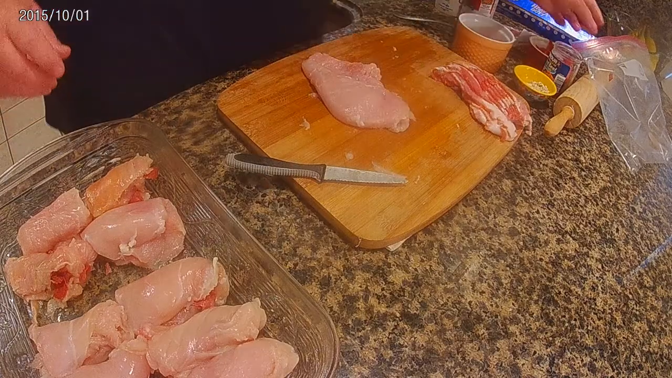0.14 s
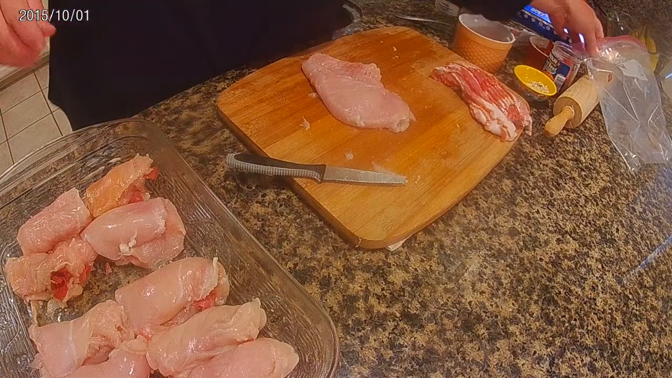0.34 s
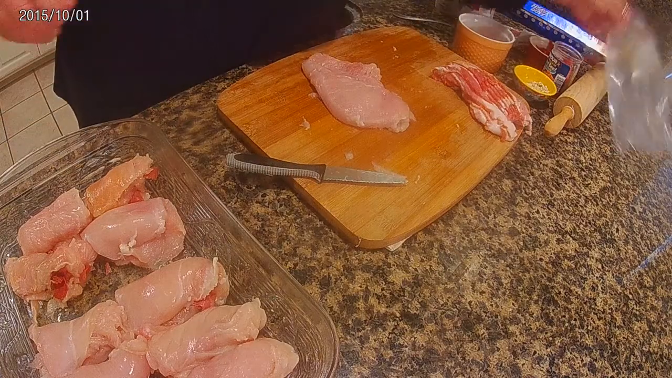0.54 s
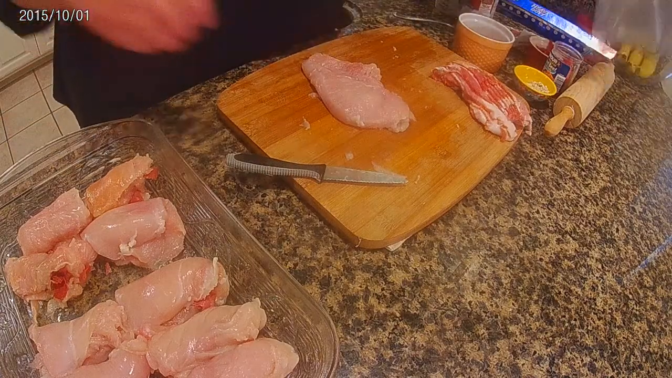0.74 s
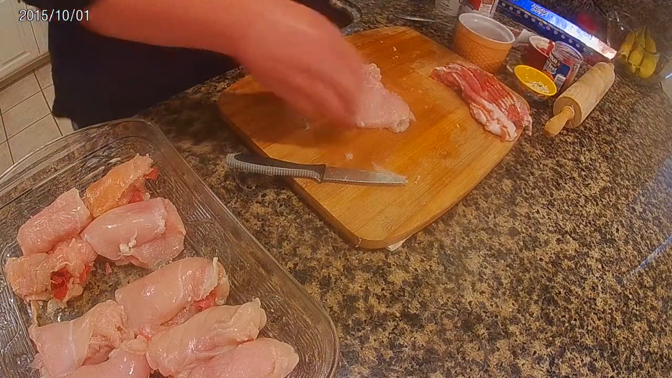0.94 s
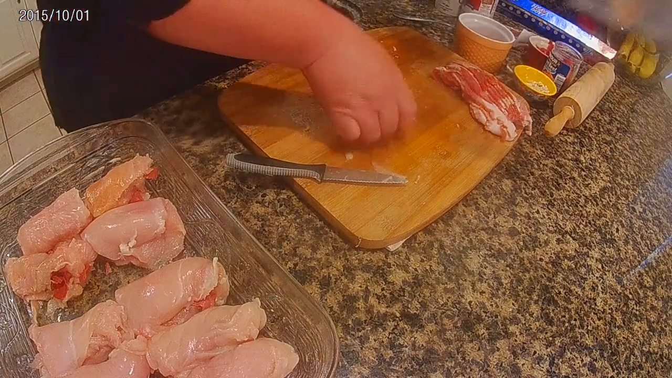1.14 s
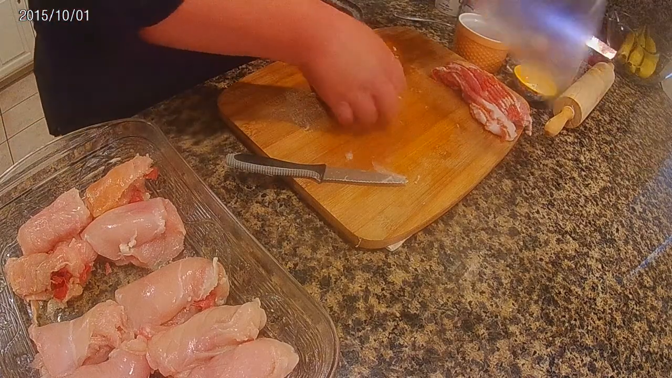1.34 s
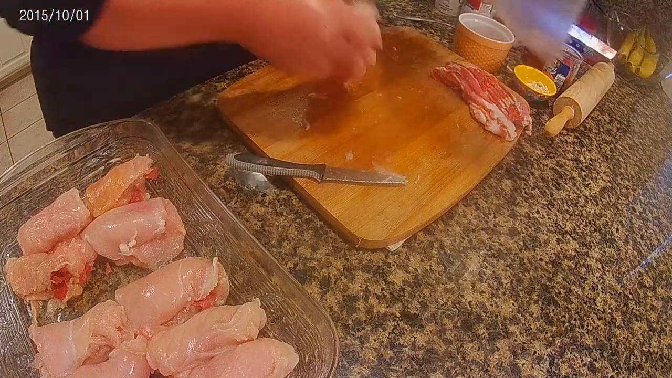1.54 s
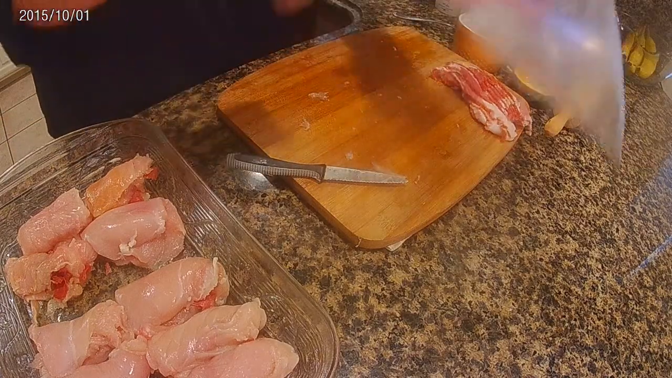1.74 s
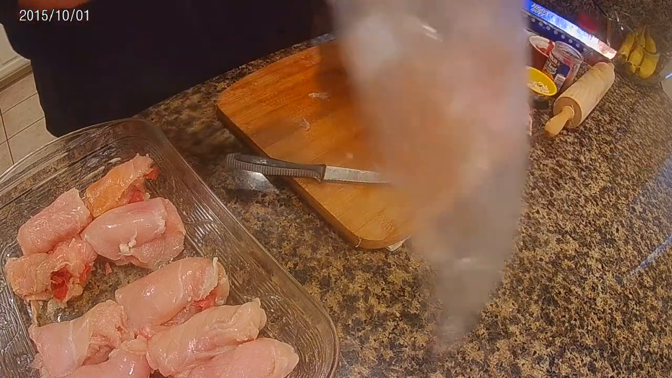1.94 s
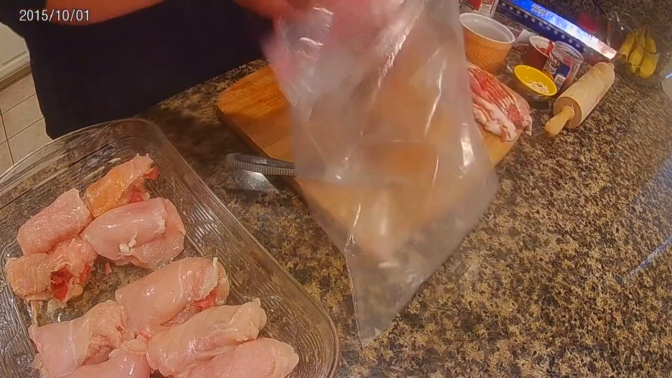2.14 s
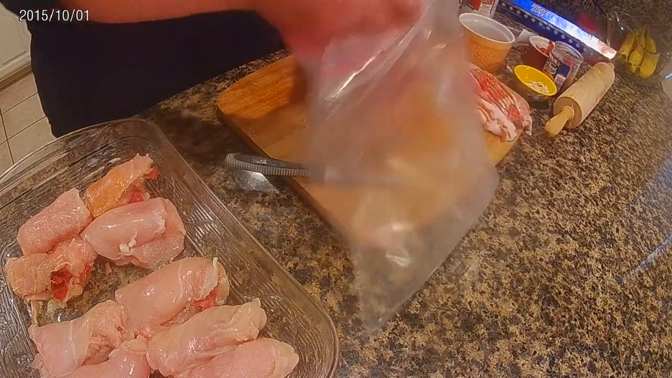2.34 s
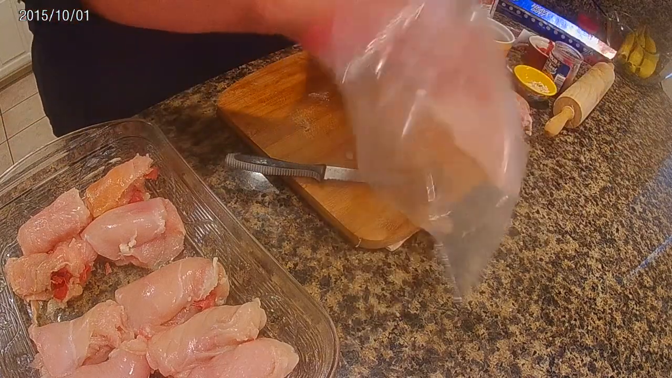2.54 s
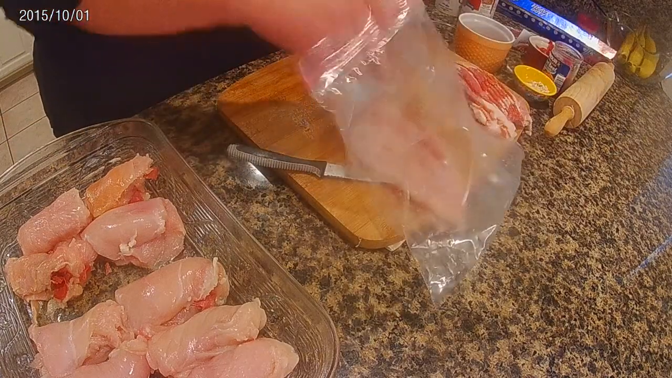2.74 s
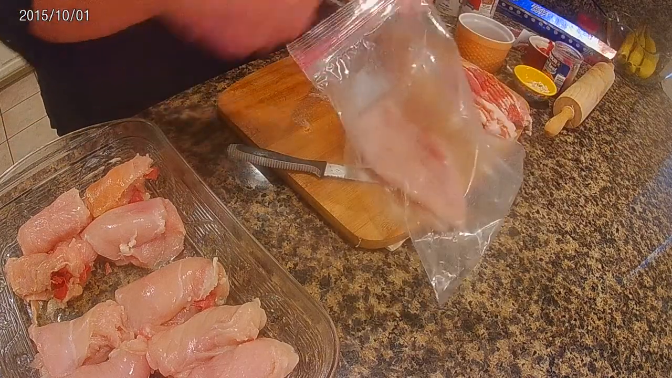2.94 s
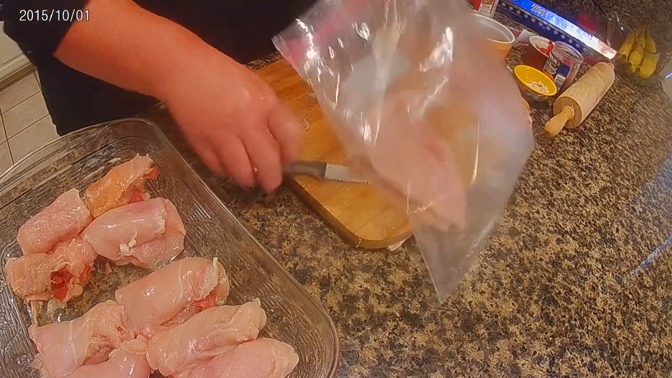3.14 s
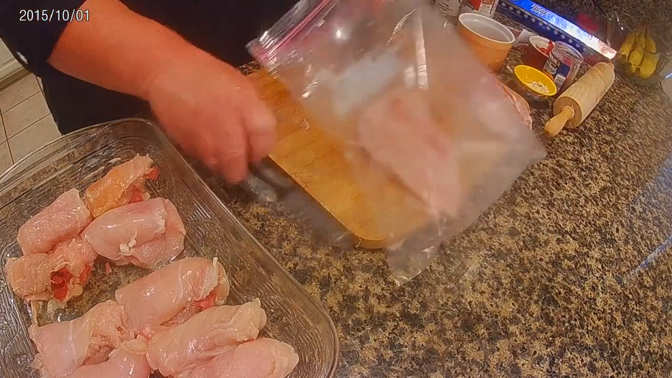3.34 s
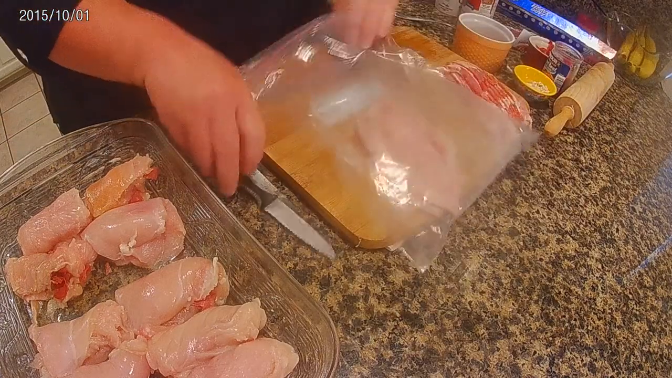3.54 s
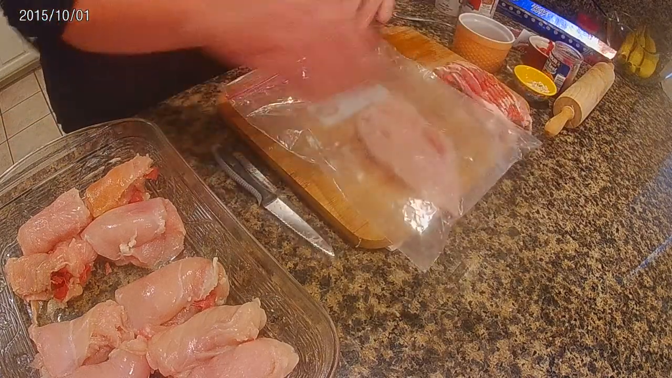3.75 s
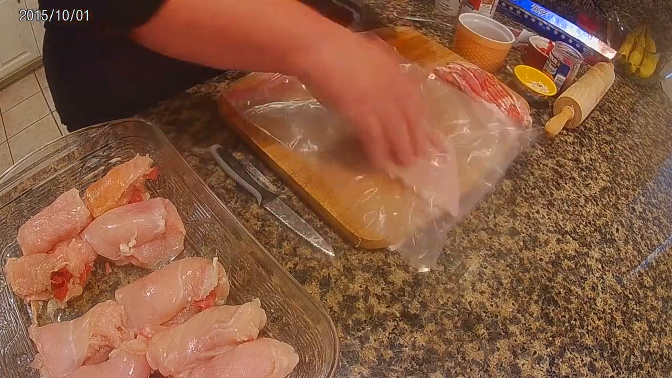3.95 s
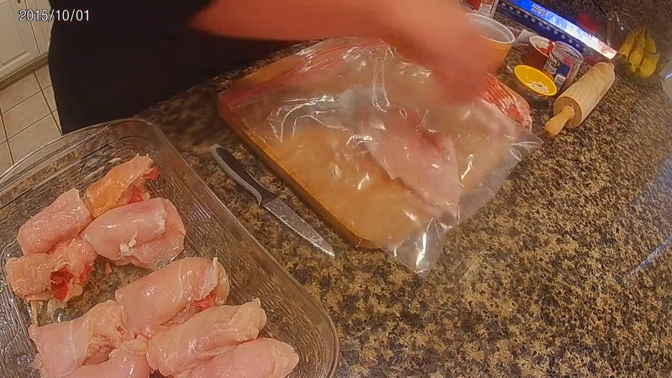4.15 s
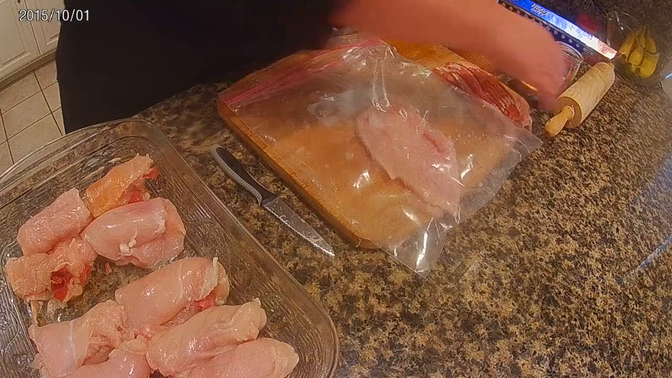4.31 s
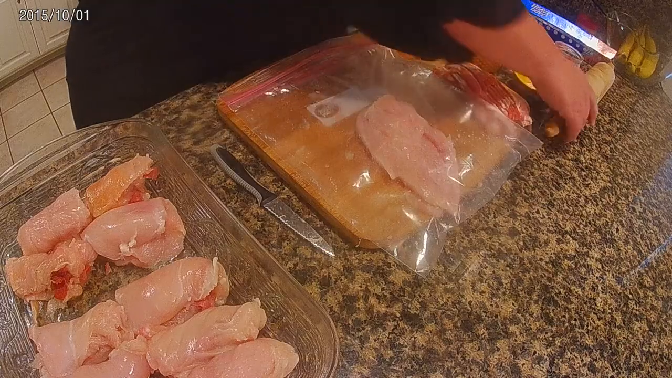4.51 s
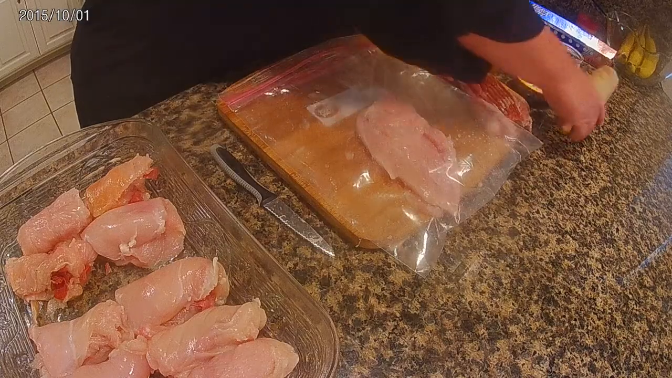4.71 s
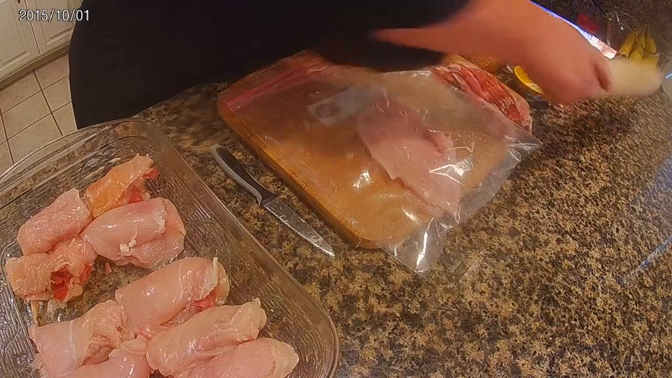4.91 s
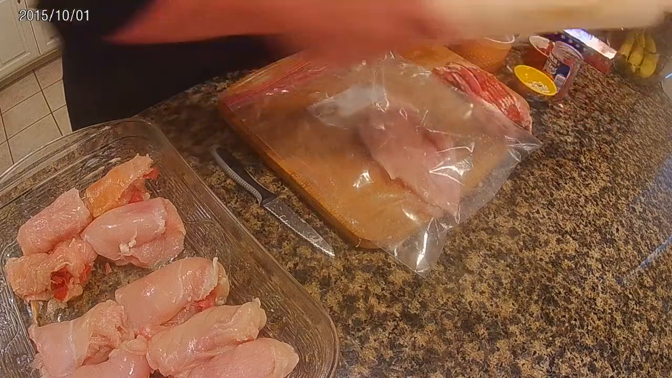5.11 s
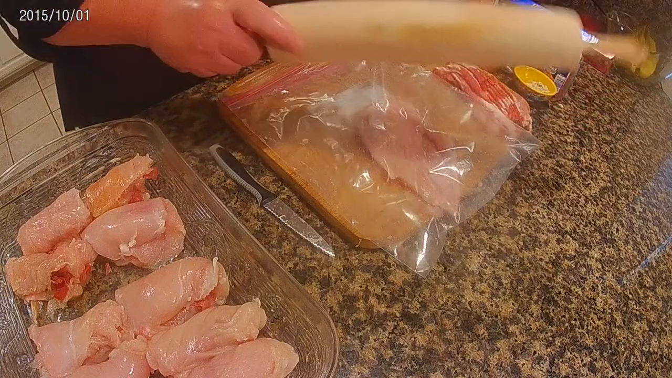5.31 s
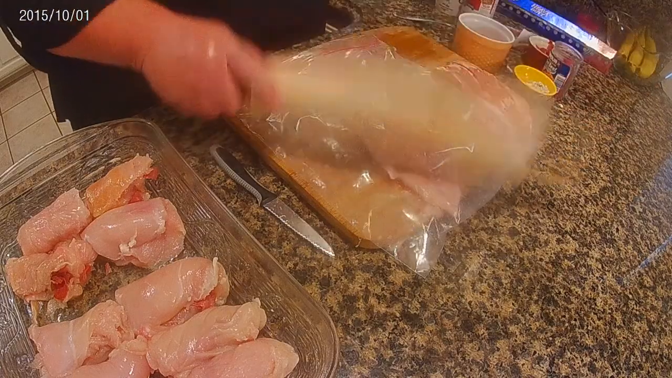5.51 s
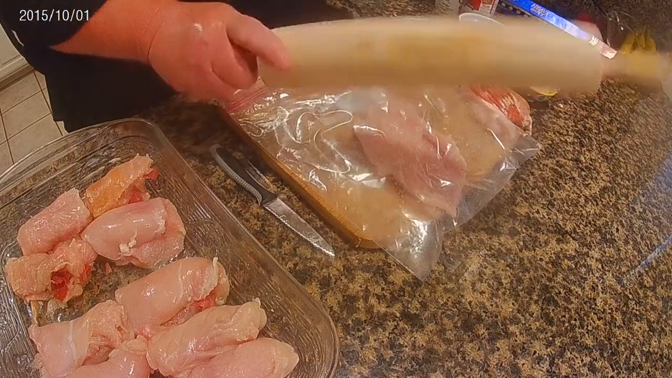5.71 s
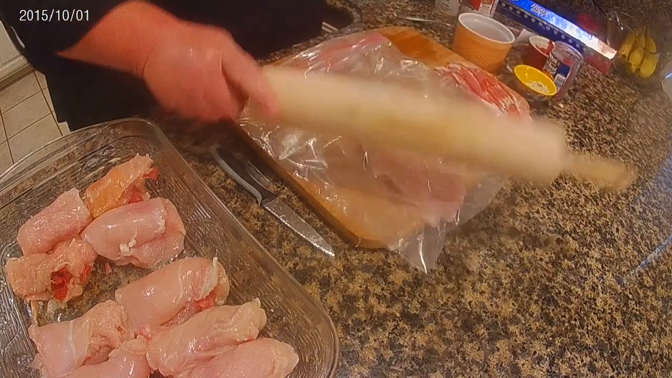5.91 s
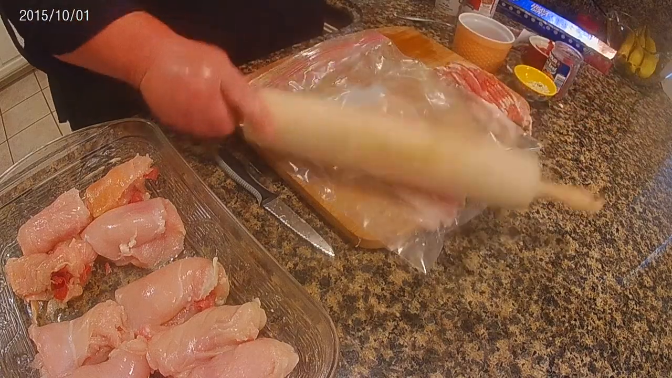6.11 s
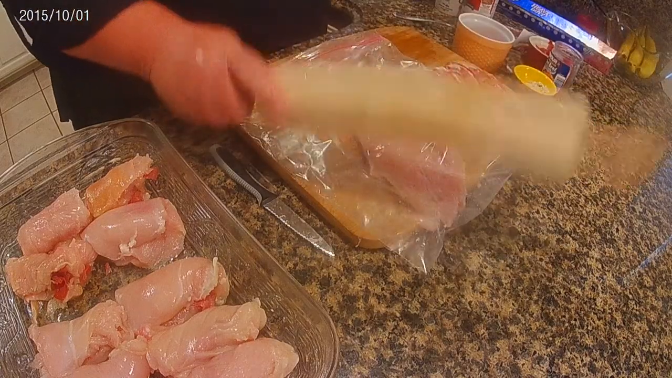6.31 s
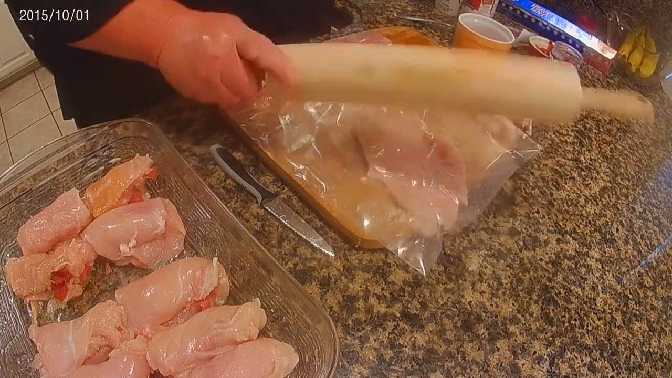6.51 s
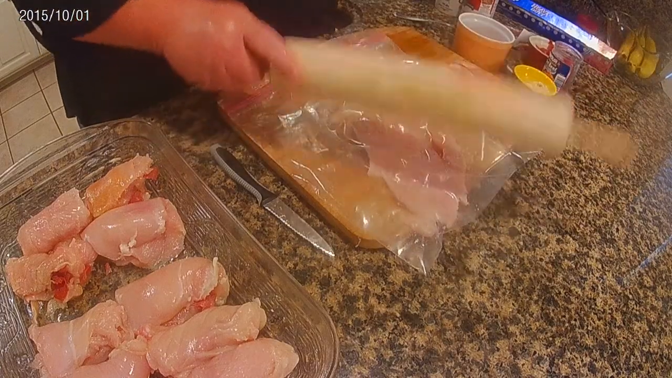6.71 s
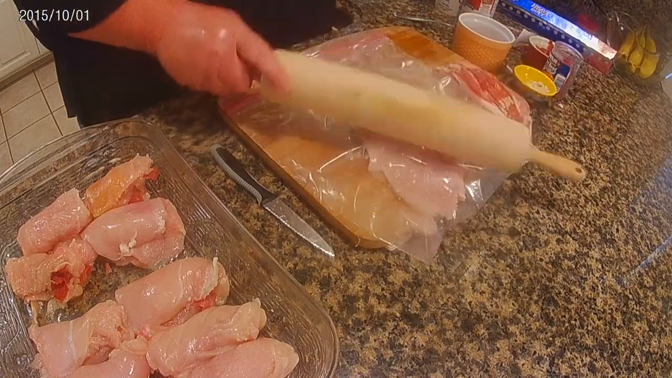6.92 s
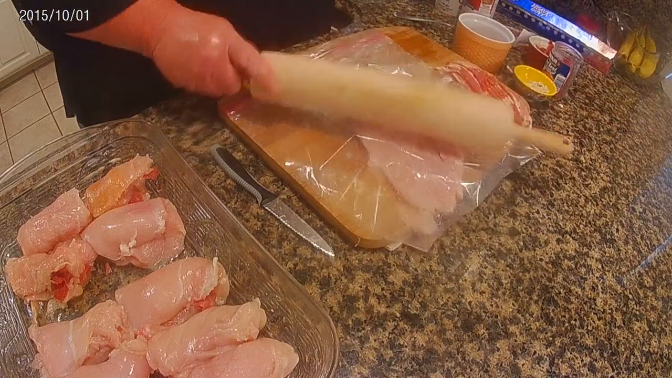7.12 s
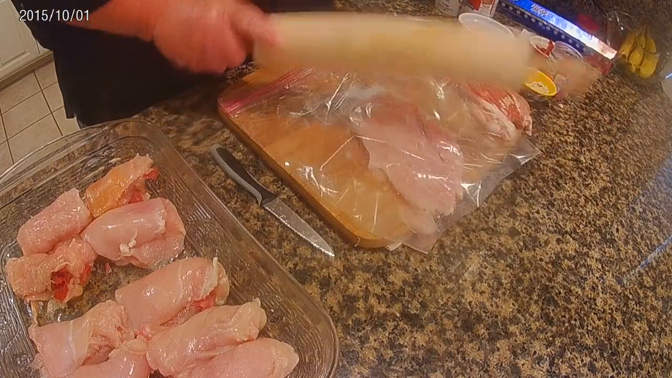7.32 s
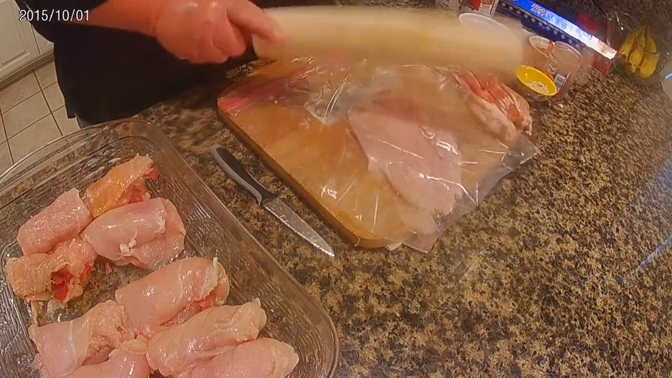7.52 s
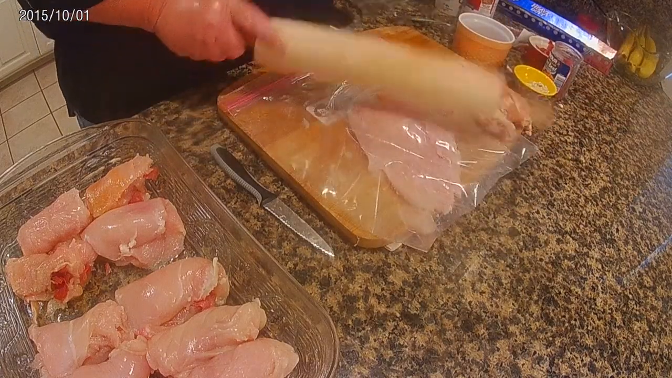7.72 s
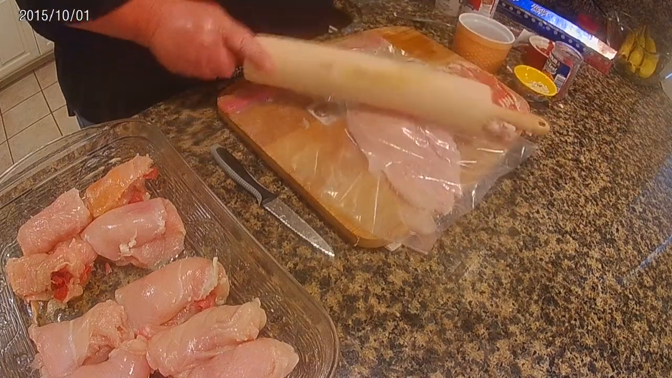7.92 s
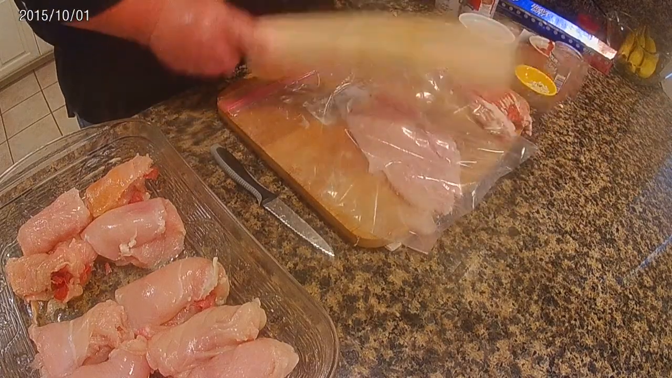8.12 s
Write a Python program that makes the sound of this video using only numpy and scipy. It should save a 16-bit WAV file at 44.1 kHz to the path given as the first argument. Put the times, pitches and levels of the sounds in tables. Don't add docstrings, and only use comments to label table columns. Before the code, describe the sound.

Thin plastic bag rustles and snaps lightly with small wooden knocks, then a rolling pin slaps meat through it in eleven fast, even blows.

```python
import sys
import numpy as np
from scipy import signal
from scipy.fft import rfft, irfft, next_fast_len
from scipy.io import wavfile
from scipy.ndimage import uniform_filter1d

SR = 44100
rng = np.random.default_rng(int(sys.argv[2]) if len(sys.argv) > 2 else 0)


def rack_gain(trim_db):
    fader = np.asarray(trim_db, float)
    return 10 ** (fader / 20)


def pcm_store(signal):
    levels = np.round(np.clip(np.atleast_2d(signal), -1, 1) * 32767)
    wavfile.write(sys.argv[1], SR, levels.astype(np.int16).T)


N = 364266

# (frequency [Hz], density [dB/Hz])
HUM_SPECTRUM = [(88, -45.5), (150, -10.5), (253, -10), (289, -9), (369, -10.5), (401, -9), (512, -8),
                (574, -11.5), (734, -7), (969, -10.5), (1020, -14.5), (1160, -11.5), (2160, -26),
                (3310, -30.5), (7500, -51.5), (9750, -81), (16500, -120)]
# (frequency [Hz], density [dB/Hz])
RUMBLE_SPECTRUM = [(13, -48.5), (22, -28.5), (65, 0), (86, -27), (99, -15), (107, 5), (129, 6.5),
                   (145, -15.5), (160, 1), (210, -32), (350, -120)]
# (frequency [Hz], density [dB/Hz])
HISS_SPECTRUM = [(4120, -33.5), (7000, -25), (9140, -4), (13600, 1), (15100, 12), (16100, -10),
                 (16400, -9.5)]
# (frequency [Hz], t60 [s])
WALL_T60 = [(100, 0.99), (300, 0.49), (1000, 0.52), (2500, 0.42), (4200, 0.41), (6500, 0.51), (10000, 0.18)]
# (frequency [Hz], gain [dB])
MIC_RESPONSE = [(40, -3.5), (300, 3.5), (1300, 1.5), (2400, -3), (3300, -12.5), (3900, -7), (5200, -17),
                (7000, -30.5), (9000, -51.5), (16000, -51)]
# (frequency [Hz], level [dB], t60 [s])
COUNTER_MODES = [(30, -18, 0.47), (63.5, -12.5, 0.5), (99.1, -1, 0.34), (119.6, -3.5, 0.38),
                 (159, -5, 0.099), (166.8, -8.5, 0.39)]
# (frequency [Hz], level [dB], t60 [s])
BOARD_MODES = [(491, -0.5, 0.19), (687, -4, 0.081), (736, -1.5, 0.12), (930, 8.5, 0.019)]
# (frequency [Hz], level [dB], t60 [s])
FLEX_MODES = [(217, -3.5, 0.044), (278, -3, 0.072), (342, -7, 0.064)]
# (frequency [Hz], level [dB], t60 [s])
LOADED_BOARD_MODES = [(486.5, -2.5, 0.14), (755, -3.5, 0.052), (930, -1, 0.096), (983, -6, 0.061)]
# (time [s], level [dB])
LEANS = [(.93, -48), (2.57, -45), (2.851, -73)]
# (time [s], level [dB])
DROPS = [(2.668, -28), (3.077, -37)]
# (time [s], effort [dB], tautness [0-1])
BAG_HANDLING = [(0.47, -30.5, 0.5), (0.57, -49.5, .5), (0.71, -60, .7), (1.13, -60, 0), (1.42, -61.5, 0.3),
                (1.71, -74, .6), (1.9, -52.5, .15), (2.04, -49, .15), (2.16, -54, 0.07), (2.33, -51, 0.6),
                (2.54, -47, 0.1), (2.66, -45, 0.7), (2.87, -52.5, .25), (3.36, -49, .1), (3.52, -44.5, .8),
                (3.68, -50.5, 0), (4.08, -94, 0.9), (4.3, -93, 1)]
# (time [s], peak [dB])
SNAPS = [(0.8736, -48), (0.8974, -39.5), (1.0295, -26.5), (1.1201, -37.5), (1.3226, -43), (1.3571, -42),
         (1.493, -43), (1.8258, -38), (1.8482, -40), (1.9041, -35), (1.947, -37), (1.9722, -31),
         (2.0223, -35), (2.0777, -32.5), (2.1533, -36.5), (2.2577, -33.5), (2.3146, -33.5), (2.379, -41),
         (2.479, -37), (2.582, -18), (2.637, -30.5), (2.6683, -23), (2.9102, -30.5), (3.062, -34),
         (3.0849, -32), (3.488, -32), (3.5789, -24.5), (3.6452, -31.5), (3.8883, -29), (3.9044, -35)]
# (time [s], peak [dB])
PINGS = [(0.5063, -57), (0.5626, -48), (0.6585, -57), (0.7677, -58), (0.8964, -50.5), (0.9583, -54.5),
         (1.294, -51), (1.913, -50), (1.973, -35), (2.1626, -49), (2.273, -51), (2.3007, -46),
         (2.3816, -51), (2.425, -45), (2.494, -48), (2.5532, -45.5), (2.5776, -39), (2.638, -48),
         (2.839, -56.5), (2.929, -48), (3.1294, -49), (3.3132, -48), (3.363, -53), (3.3834, -46.5),
         (3.414, -47), (3.4884, -26.5), (3.5775, -42.5), (3.6463, -57), (3.8953, -47), (3.9025, -37.5)]
# (time [s], peak [dB], pitch [Hz])
KNOCKS = [(0.562, -38, 756), (1.058, -27, 810), (1.076, -51, 1200), (1.914, -28, 1330),
          (1.946, -26.5, 1210), (2.029, -39, 1270), (2.089, -33, 1380), (2.313, -33, 1230),
          (2.571, -18.5, 1500), (2.584, -21, 1330), (2.914, -28.5, 1370), (2.937, -30, 875),
          (3.078, -34, 783), (3.094, -25, 870), (3.363, -30.5, 1140), (3.477, -20, 1320),
          (3.509, -27, 1470), (3.55, -26.5, 810), (3.599, -29, 770), (3.892, -24.5, 1330),
          (3.903, -22.5, 1400), (4.529, -40, 604), (4.557, -43, 581), (4.599, -50, 495)]
# (time [s], peak [dB], top end [dB])
TICKS = [(5.5226, -25.5, -63), (5.825, -16, -38), (5.854, -37, -51), (6.085, -29, -64), (6.3491, -25, -61),
         (6.8412, -27, -53), (6.869, -33.5, -37), (7.1197, -34, -49), (7.3445, -24, -50),
         (7.3758, -41, -47), (7.6038, -29.5, -55), (8.1363, -39, -44), (8.165, -60, -48)]
# (first [s], gap [s], bounces [count], peak [dB], pitch [Hz])
CHATTER = [(5.509, 0.022, 3, -33, 835), (5.795, .0145, 5, -15.5, 1030), (6.072, .018, 2, -23, 860),
           (6.348, .012, 2, -23.5, 900), (6.574, 0.016, 4, -14, 920), (6.819, 0.023, 2, -23, 836),
           (7.077, 0.016, 5, -15.5, 953), (7.346, .0175, 3, -18.5, 930), (7.594, 0.014, 4, -16, 950),
           (7.848, 0.02, 6, -6.5, 1115), (8.124, 0.018, 4, -14.5, 860)]
# (time [s], peak [dB], pitch [Hz])
GRAZE = (5.48, -17, 1200)
# (time [s], force [dB], wood contact [dB], flat landing [0-1], slap pitch [Hz])
BLOWS = [(5.488, -6, -45.5, 0.28, 1340), (5.784, -7, -23, 0.66, 1150), (6.049, -4.5, -18, 0.2, 1390),
         (6.3112, -6, -17, .08, 1450), (6.544, -10, -42.5, 1, 1180), (6.805, -8, -44, 0.6, 1370),
         (7.052, -11, -36.5, 0.46, 1130), (7.308, -7, -35, 0.52, 1210), (7.565, -5.5, -29.5, 0.48, 1540),
         (7.834, 3, -10, 0.13, 1135), (8.097, -6.5, -30.5, 0.43, 1440)]

HUM_DB, RUMBLE_DB, HISS_DB = -52.5, -67, -88.5
WALLS_DB = -9
CLOSE_DB = -1.5
SLACK_TREBLE_DB, TAUT_TREBLE_DB, CRACKLE_SHARE = -36, -3.5, 0.48
SNAP_HZ, SNAP_DETUNE = 1330, 0.14
PING_HZ, PING_DETUNE = 4520, 0.05
BOUNCE_LOSS_DB, BOUNCE_SCATTER_DB, BOUNCE_DETUNE = -2, 2, 0.06
FLAT_S, FLAT_TREBLE = 0.0056, 2.4
ECHO_DB, ECHO_FLAT_DB = 14.5, -3
SHINE_DB, SHINE_FLAT_DB = -17.5, 10.5
FLEX_DB, FLEX_PER_WOOD, FLEX_DB_PER_S = -11.5, 0.17, -4
RASP_DB, RASP_PER_WOOD, RASP_PER_FORCE = -22.5, 0.16, 0.62
THUMP_DB, REST_S = -26.5, 0.048


def add(out, s, sound):
    i = int(s * SR)
    out[i:i + len(sound)] += sound[:N - i]


def on_log(hz, table):
    table_hz, values = np.transpose(table)
    return np.interp(np.log(hz + 1e-9), np.log(table_hz), values)


def band(x, hz, width_hz):
    return signal.lfilter(*signal.iirpeak(hz, hz / width_hz, fs=SR), x)


def unit(x):
    return x / np.sqrt(np.mean(x ** 2))


def decay(t, t60_s):
    return rack_gain(-60 * t / t60_s)


def burst(rise_s, t60_s, size=8192):
    t = np.arange(size) / SR
    return rng.standard_normal(size) * (1 - np.exp(-t / rise_s)) * decay(t, t60_s)


def ring(modes, push_s, spread_db=0, size=16384):
    t = np.arange(size) / SR
    y = np.zeros(size)
    for k, (hz, db, t60_s) in enumerate(modes):
        mode_db = db + spread_db * rng.standard_normal()
        y += (-1) ** k * rack_gain(mode_db) * decay(t, t60_s) * np.sin(2 * np.pi * hz * t)
    push = np.hanning(max(int(push_s * SR), 3) + 2)
    return np.convolve(y, push / push.sum())[:size]


def walk(rate_hz):
    k = int(SR / rate_hz)
    steps = np.repeat(rng.standard_normal(N // k + 1), k)
    smooth = uniform_filter1d(uniform_filter1d(steps, k), k)
    return unit(smooth[:N])


def steady(spectrum, db):
    size = next_fast_len(N)
    hz = np.arange(size // 2 + 1) * SR / size
    noise = irfft(rfft(rng.standard_normal(size)) * rack_gain(on_log(hz, spectrum)), size)
    return unit(noise[:N]) * rack_gain(db)


def small_hits(rows, rise_s, t60_s, sharp, broad, gain_db):
    out = np.zeros(N)
    for s, db, hz in rows:
        push = burst(rise_s, t60_s, size=4096)
        hit = unit(band(push, hz, hz / sharp)) + broad * unit(push)
        add(out, s, rack_gain(db + gain_db) * hit / np.abs(hit).max())
    return signal.sosfilt(signal.butter(2, 250, "high", fs=SR, output="sos"), out)


def appliances():
    hum = steady(HUM_SPECTRUM, HUM_DB) * rack_gain(0.69 * walk(5.3))
    return hum + steady(RUMBLE_SPECTRUM, RUMBLE_DB) + steady(HISS_SPECTRUM, HISS_DB)


def walls(size=32768):
    t = np.arange(size) / SR
    tail = np.zeros(size)
    for hz in 80 * 2.0 ** np.arange(8):
        octave = unit(band(rng.standard_normal(size), hz, 0.69 * hz))
        tail += octave * np.sqrt(hz) * decay(t, on_log(hz, WALL_T60))
    tail *= 1 - np.exp(-t / 0.0024)
    return tail / np.sqrt(np.sum(tail ** 2))


def kitchen(far, close):
    into_room = far + rack_gain(CLOSE_DB) * close
    return far + close + rack_gain(WALLS_DB) * signal.fftconvolve(into_room, walls())[:N]


def microphone(x, size=2048):
    hz = np.arange(size // 2 + 1) * SR / size
    cepstrum = irfft(on_log(hz, MIC_RESPONSE) * np.log(10) / 20)
    cepstrum[1:size // 2] *= 2
    cepstrum[size // 2 + 1:] = 0
    return signal.fftconvolve(x, irfft(np.exp(rfft(cepstrum))))[:N]


def weight():
    out = np.zeros(N)
    for s, db in DROPS:
        add(out, s, rack_gain(db) * ring(LOADED_BOARD_MODES, 0.00044))
    for s, db in LEANS:
        add(out, s, rack_gain(db + 4.5) * ring(COUNTER_MODES[1:3], 0.015))
    return out


def bag():
    s, *columns = np.transpose(BAG_HANDLING)
    t = np.arange(N) / SR
    db, taut = (np.interp(t, s, c) for c in columns)
    treble_db = db + SLACK_TREBLE_DB + (TAUT_TREBLE_DB - SLACK_TREBLE_DB) * taut
    clicks = (rng.random(N) < 300 / SR) * rack_gain(np.minimum(3 * rng.exponential(size=N), 9))
    fold_shape = signal.lfilter([1], [1, -np.exp(-1 / (0.0021 * SR))], clicks)
    folds = fold_shape * rng.standard_normal(N)
    film = np.sqrt(1 - CRACKLE_SHARE) * rng.standard_normal(N) + np.sqrt(CRACKLE_SHARE) * unit(folds)
    film *= rack_gain(1.2 * walk(24.62))
    low = rack_gain(db - 1) * unit(band(film, 1170, 1100))
    high = rack_gain(treble_db + 6.5) * unit(band(film, 4300, 2500))
    return (low + high) * np.clip((t - s[0]) * 10, 0, 1) * (t < s[-1])


def creases(rows, hz, detune):
    return [(s, db, hz * np.exp(detune * rng.standard_normal())) for s, db in rows]


def snaps():
    rows = creases(SNAPS, SNAP_HZ, SNAP_DETUNE)
    return small_hits(rows, 0.00093, 0.016, sharp=2.6, broad=1, gain_db=6)


def pings():
    rows = creases(PINGS, PING_HZ, PING_DETUNE)
    return small_hits(rows, 0.00054, 0.012, sharp=0.41, broad=0.32, gain_db=22)


def knocks():
    return small_hits(KNOCKS, 0.0031, 0.12, sharp=1.55, broad=0.66, gain_db=-1.5)


def handle():
    out, top = np.zeros(N), np.zeros(N)
    for s, db, top_db in TICKS:
        tick = burst(0.00064, 0.01, size=1024)
        tick /= np.abs(tick).max()
        axle = band(tick, 5700, 1900) + band(tick, 4240, 320)
        add(out, s, rack_gain(db + 14.5) * (axle + 0.5 * tick))
        add(top, s, rack_gain(db + top_db + 3.5) * np.diff(tick))
    return out, top


def chatter():
    rows = [GRAZE]
    for s, gap_s, count, db, hz in CHATTER:
        for k in range(round(count)):
            scatter, detune = rng.standard_normal(2)
            bounce_db = db + k * BOUNCE_LOSS_DB + BOUNCE_SCATTER_DB * scatter
            rows.append((s + k * gap_s, bounce_db, hz * np.exp(BOUNCE_DETUNE * detune)))
    return small_hits(rows, 0.00082, 0.037, sharp=4.3, broad=0.13, gain_db=-1)


def rasp(hold_s, t60_s, size=16384):
    t = np.arange(size) / SR
    grain_db = 3.5 * uniform_filter1d(rng.standard_normal(size), 150) * np.sqrt(150)
    grains = rng.standard_normal(size) * rack_gain(grain_db)
    shape = (1 - np.exp(-(t / 0.01) ** 2)) * decay(np.maximum(t - hold_s, 0), t60_s)
    return (unit(band(grains, 697, 830)) + 0.1 * unit(grains)) * shape


def slap(flat, hz):
    crack = burst(FLAT_S * flat, 0.016 + 7 * FLAT_S * flat)
    treble = FLAT_TREBLE * flat * crack * decay(np.arange(len(crack)) / SR, 0.13)
    y = band(crack, hz, 760) + treble
    return y / np.abs(y).max()


def slap_echo(flat, hz):
    tail = walls()
    shine = rack_gain(SHINE_DB + SHINE_FLAT_DB * flat) * band(tail, 4000, 4000)
    return rack_gain(ECHO_DB + ECHO_FLAT_DB * flat) * (band(tail, hz, 1300) + 0.17 * tail + shine)


def pin():
    air, near = np.zeros(N), np.zeros(N)
    for s, force_db, wood_db, flat, hz in BLOWS:
        flex_db = FLEX_DB + FLEX_PER_WOOD * wood_db + FLEX_DB_PER_S * (s - BLOWS[0][0])
        rasp_db = RASP_DB + RASP_PER_WOOD * wood_db + RASP_PER_FORCE * force_db
        add(near, s - 0.001, rack_gain(force_db + 4) * slap(flat, hz))
        add(near, s, rack_gain(force_db) * slap_echo(flat, hz))
        add(near, s, rack_gain(wood_db) * ring(BOARD_MODES, 0.0016, spread_db=4))
        add(near, s + 0.0021, rack_gain(flex_db) * ring(FLEX_MODES, 0.0021, spread_db=0.5))
        add(near, s, rack_gain(THUMP_DB) * ring(COUNTER_MODES, 0.0036))
        add(air, s, rack_gain(rasp_db) * rasp(REST_S, 0.15))
    return air, near


def scene():
    air, near = pin()
    ticks, top = handle()
    far = air + chatter() + knocks()
    close = ticks + snaps() + pings() + bag() + weight()
    heard = kitchen(far, close) + near
    return (microphone(heard) + top + appliances())[None]


def roll_off(x):
    return signal.sosfilt(signal.butter(12, 16600, fs=SR, output="sos"), x)


def record(dry):
    ceiling, top_hz = 0.78, 15900
    flat = dry / (1 + np.abs(dry / ceiling) ** 3) ** (1 / 3)
    cut = signal.sosfilt(signal.ellip(8, 0.2, 60, top_hz, fs=SR, output="sos"), flat)
    return roll_off(cut)


dry = scene()
out = record(dry)
pcm_store(out)
```